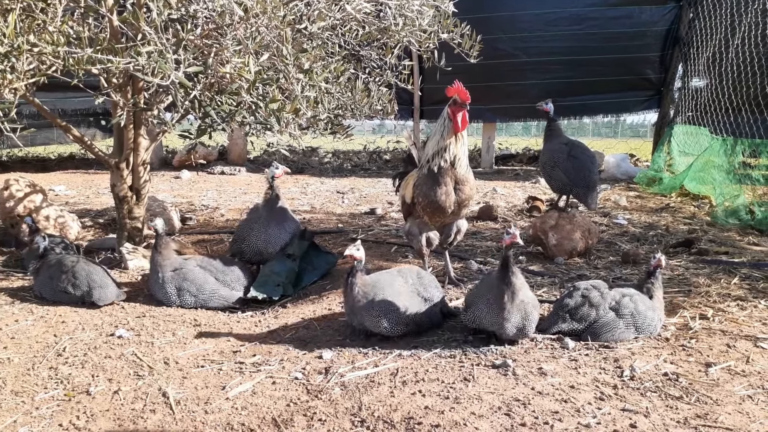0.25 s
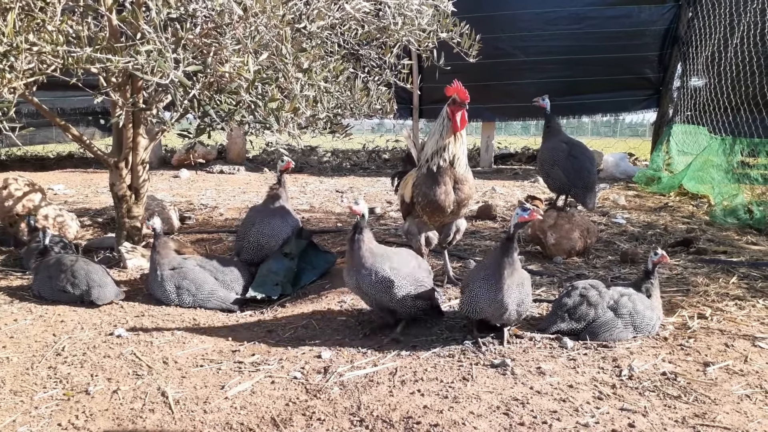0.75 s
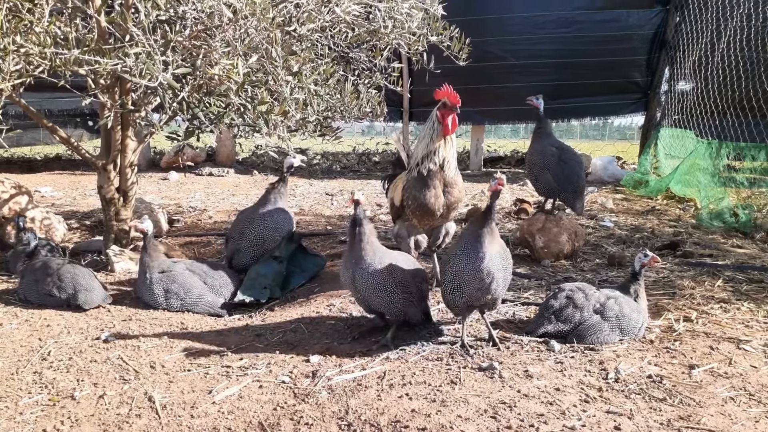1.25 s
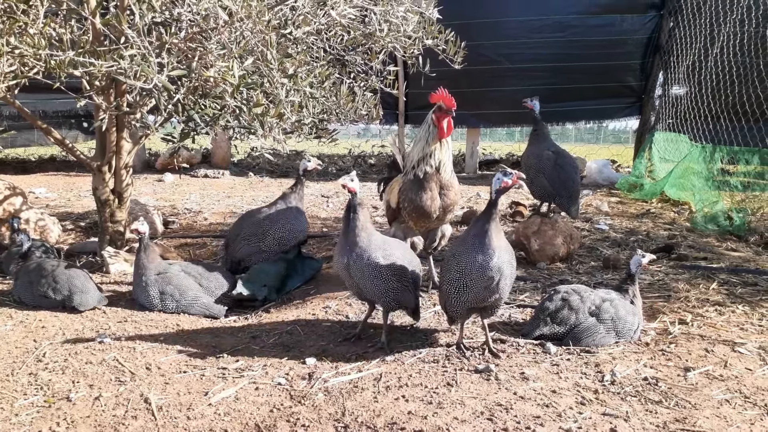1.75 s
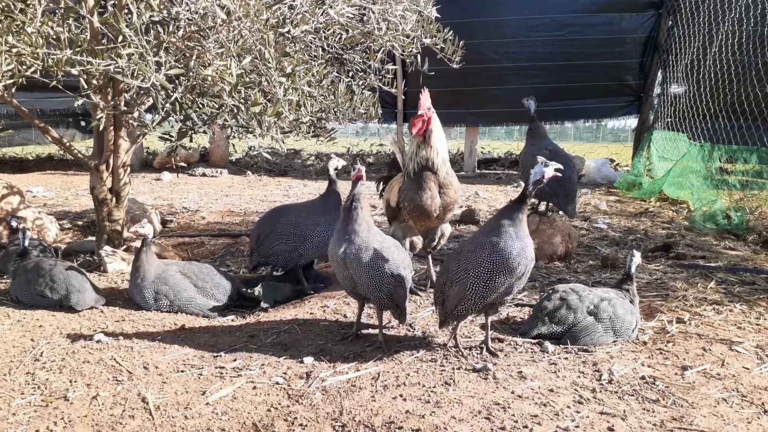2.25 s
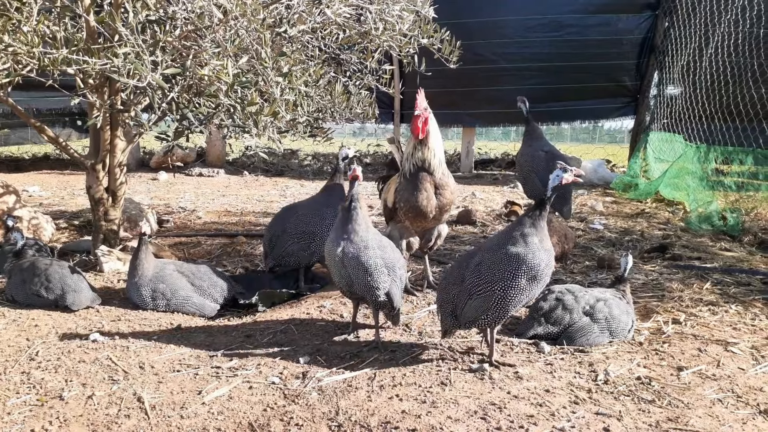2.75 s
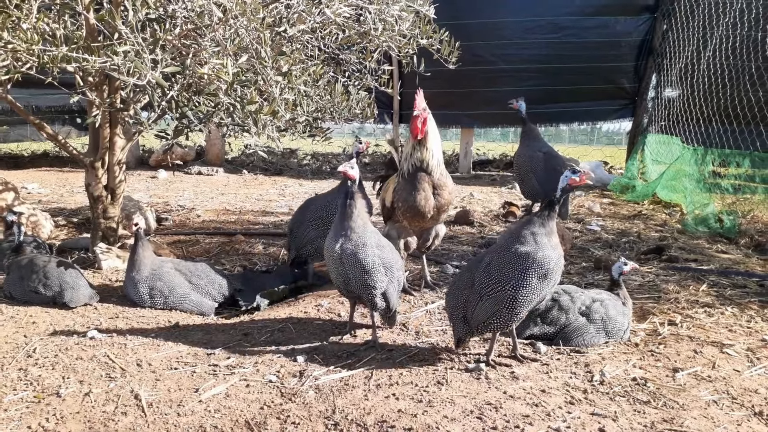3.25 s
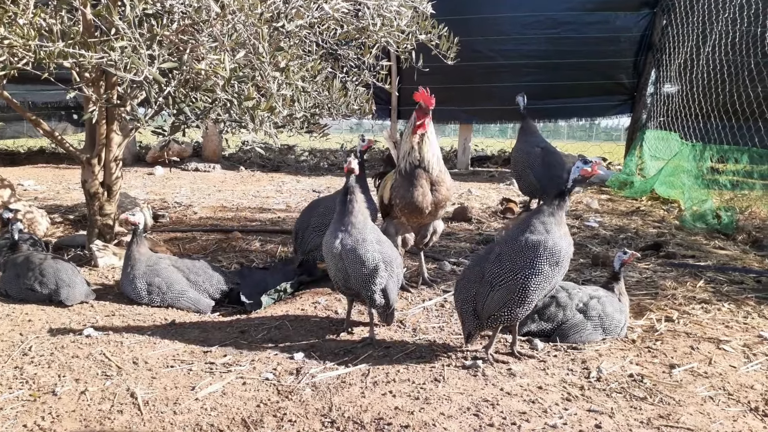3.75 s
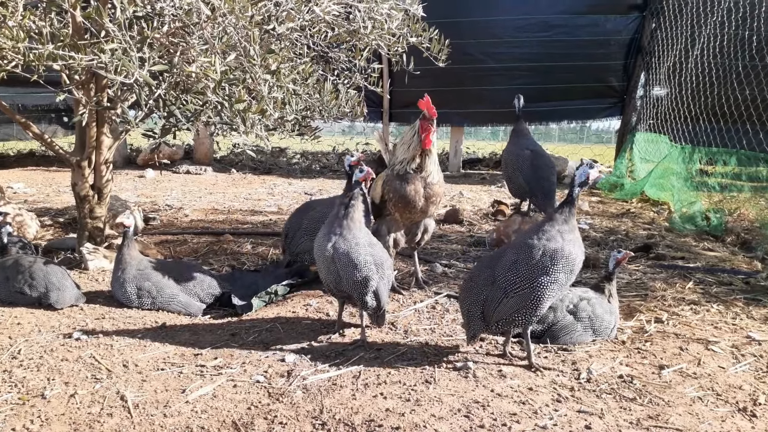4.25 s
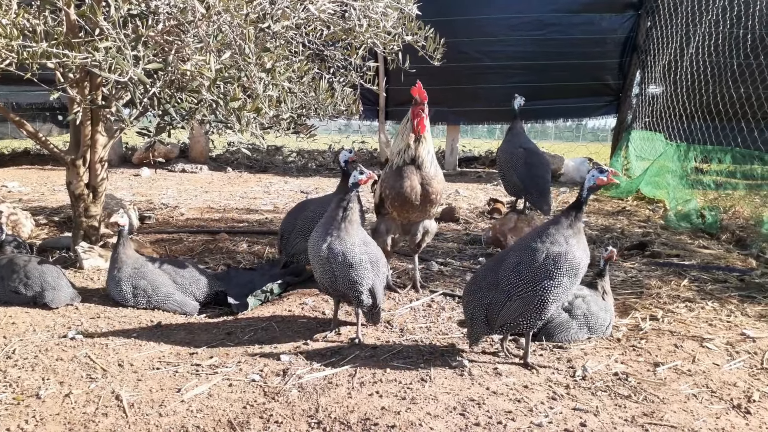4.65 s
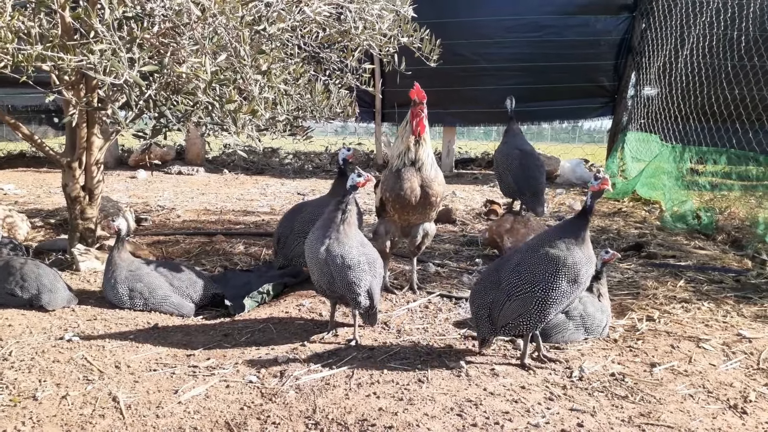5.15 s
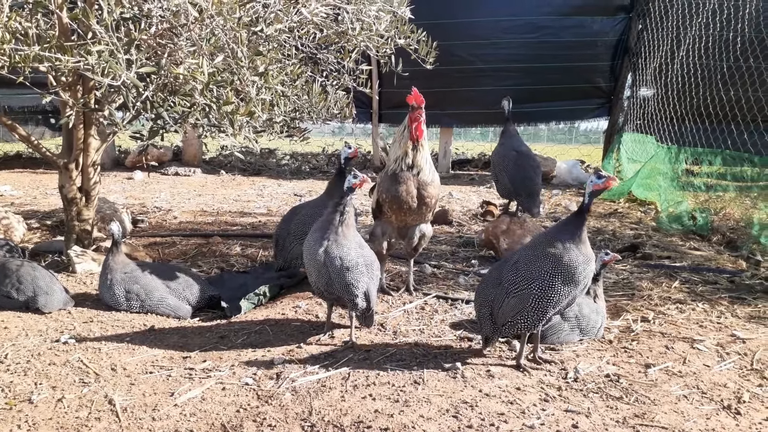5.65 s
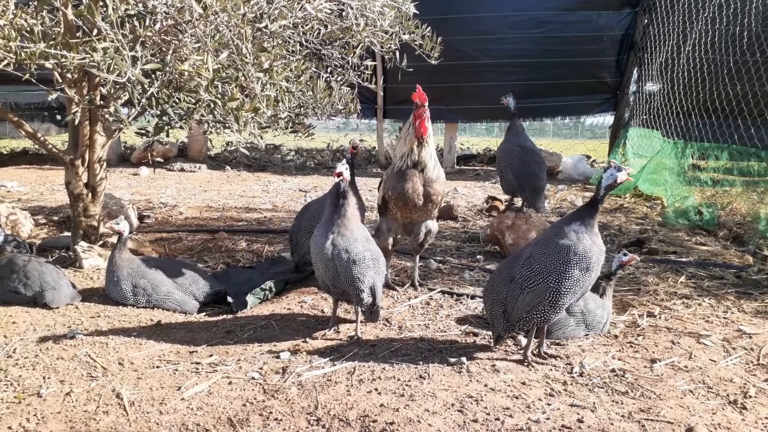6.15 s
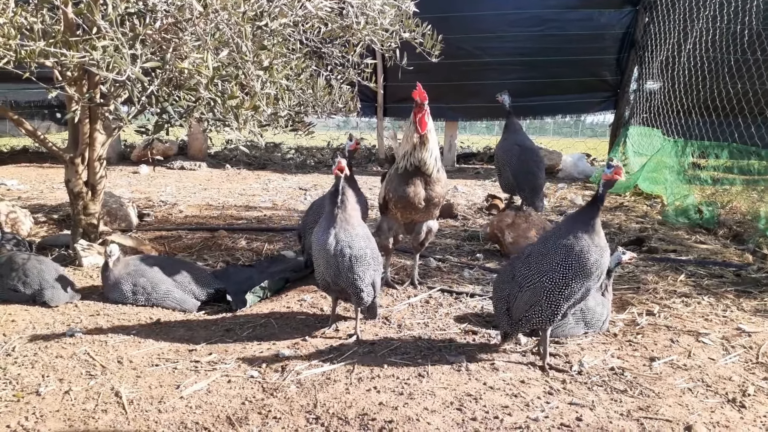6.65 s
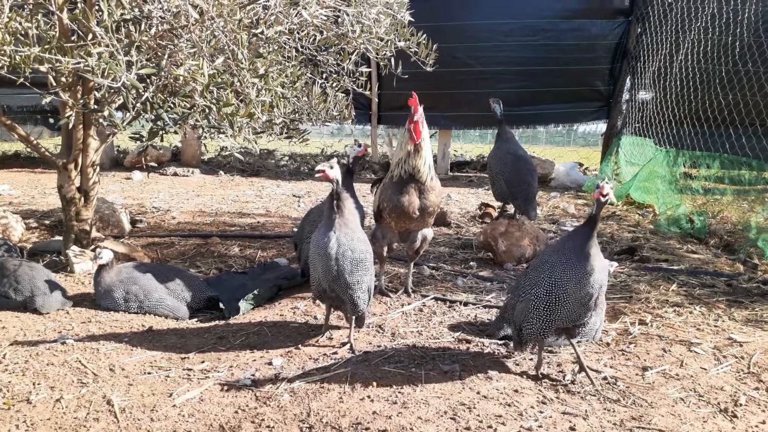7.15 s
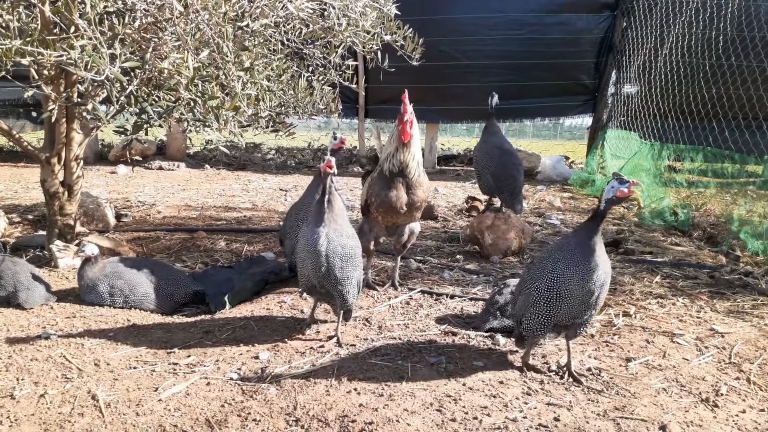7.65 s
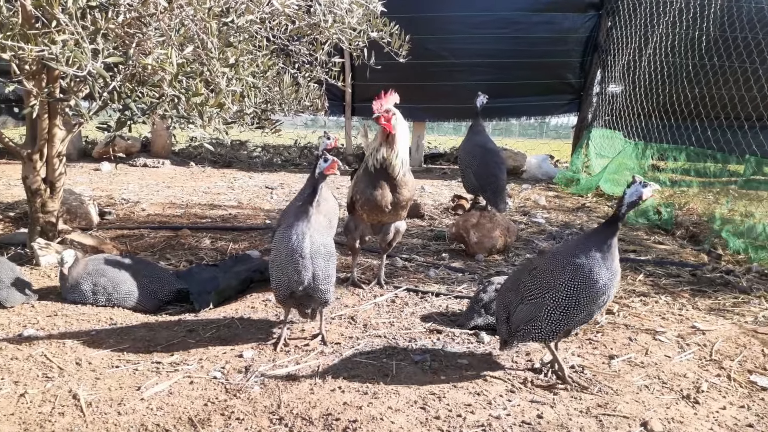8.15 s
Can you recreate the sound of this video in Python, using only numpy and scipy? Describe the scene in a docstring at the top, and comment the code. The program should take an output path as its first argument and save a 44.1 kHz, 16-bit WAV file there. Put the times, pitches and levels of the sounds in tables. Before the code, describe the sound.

Two guinea fowl a few metres away give short raspy cackles in an outdoor farm run, many opened by a quick high whistle or thin squeak. Sparse at first, the calls become steady, then a rooster crows once in the middle, its last syllable long and rough. A rattling chatter follows and the cackling thickens to the end. Phone stereo sound, dry and close, faint yard rumble.

```python
"""Guinea fowl cackle a few metres from a phone in an open farm run: a raspy syrinx buzz through throat and beak,
often opened by a short whistle or thin squeak; one bird rattles the same buzz in bursts.
A rooster crows once among them, a stack of partials between clear and hoarse that doubles its period
in the long last syllable. Ticks and scratching feet are scraps of noise; behind lie a short echo
off ground, fence and shed and a faint rumble of the yard."""
import sys
import numpy as np
from scipy import signal
from scipy.fft import rfft, irfft, next_fast_len
from scipy.io import wavfile
from scipy.ndimage import uniform_filter1d

SR = 44100
rng = np.random.default_rng(int(sys.argv[2]) if len(sys.argv) > 2 else 0)


def dump_mix(stems):
    """Bounce the given channels to the path in sys.argv[1] as a 16-bit WAV at rate SR."""
    frames = np.atleast_2d(stems).T  # one column per channel
    limited = np.clip(frames, -1, 1)  # hard clip at full scale
    pcm = np.round(limited * 32767).astype(np.int16)
    wavfile.write(sys.argv[1], SR, pcm)


N = 369999

LEFT, RIGHT = 0, 1  # the two calling birds, as rows of FOWL
# The two birds. Each row: pitch every note sags toward in Hz, swell over a note in dB, lag at the left port
# in samples, throat resonance in Hz before the beak moves it, its gain in dB, beak resonances as a ratio.
FOWL = [(331.6, -0.5, 0.8, 1985, 16.4, 1.0206), (318, -3.5, 6, 1886, 15, 1.025)]
# Notes shorter than FULL_S (seconds) sag further.
CLIPPED_HZ_PER_S, FULL_S = 453, 0.08
# Cackles. Each row: start in seconds, length in seconds, opening pitch in Hz, relative level in dB,
# beak opening in dB, bird.
CACKLES = [(0, 0.045, 380, -26, -.5, RIGHT), (0.237, 0.058, 351, -34, 2, RIGHT),
           (0.446, 0.066, 344, -18.5, -0.5, RIGHT), (0.511, 0.038, 386, -28, -8.5, LEFT),
           (0.727, 0.043, 358, -19, -10, RIGHT), (1.029, 0.052, 370, -18, -4, RIGHT),
           (1.212, 0.1, 376, -21.5, -0.5, LEFT), (1.289, .12, 356, -23, -3.5, RIGHT),
           (1.463, 0.089, 359, -20.5, -2, LEFT), (1.589, 0.04, 397, -18, -6, RIGHT),
           (1.722, 0.11, 339, -19.5, -2, LEFT), (1.82, 0.081, 391, -15.5, -5, RIGHT),
           (2.065, 0.069, 403, -18, -4.5, RIGHT), (2.313, 0.043, 397, -18.5, -6.5, RIGHT),
           (2.465, .09, 341, -25.5, -3.5, RIGHT), (2.565, 0.087, 395, -17, -5, RIGHT),
           (2.779, 0.089, 348, -32, 3, RIGHT), (2.836, 0.07, 383, -19, -4, RIGHT),
           (2.966, 0.035, 411, -30, 1, LEFT), (3.043, .092, 404, -17, -3, RIGHT),
           (3.185, 0.097, 365, -22.5, -1, LEFT), (3.288, 0.015, 348, -20.5, 5, LEFT),
           (3.336, 0.059, 394, -18, -2.5, RIGHT), (3.466, 0.082, 353, -21, 0.5, LEFT),
           (3.55, 0.08, 409, -17, -2, RIGHT), (3.775, 0.088, 402, -16.5, -1, RIGHT),
           (4.036, 0.059, 397, -19.5, -5, RIGHT), (4.114, 0.18, 353, -25, -3, RIGHT),
           (4.261, 0.077, 411, -19, -2.5, RIGHT), (4.535, 0.097, 368, -21, -7.5, RIGHT),
           (4.757, .075, 392, -15.5, -4, RIGHT), (4.874, 0.15, 353, -23.5, -10, LEFT),
           (5.015, 0.09, 383, -17.5, -5.5, RIGHT), (5.173, 0.13, 361, -23.5, -9.5, LEFT),
           (5.465, 0.07, 362, -21, -6.5, RIGHT), (5.823, 0.12, 359, -24.5, -7, LEFT),
           (6.086, 0.1, 382, -21, -2.5, RIGHT), (6.178, .092, 374, -20.5, 4.5, LEFT),
           (6.378, 0.088, 388, -18, -2.5, LEFT), (6.447, .17, 366, -20, .5, LEFT),
           (6.582, 0.055, 333, -31, 14.5, LEFT), (6.638, 0.076, 390, -21.5, -5, RIGHT),
           (6.717, 0.067, 378, -22.5, 7.5, LEFT), (6.795, .11, 353, -22, 5, LEFT),
           (6.897, 0.066, 398, -19.5, -.5, RIGHT), (6.939, 0.056, 383, -20, 4, LEFT),
           (7.07, 0.12, 374, -23, 5.5, LEFT), (7.155, 0.069, 399, -19.5, -7.5, LEFT),
           (7.219, .075, 357, -29, -6.5, RIGHT), (7.295, .11, 376, -22, 5, LEFT),
           (7.399, .069, 386, -18, -1.5, RIGHT), (7.524, 0.071, 398, -21, 5, LEFT),
           (7.619, 0.079, 364, -22, 3, LEFT), (7.697, 0.067, 385, -21.5, -2.5, RIGHT),
           (7.744, 0.066, 400, -20.5, 4.5, LEFT), (7.901, 0.074, 358, -23, 3.5, RIGHT),
           (7.948, 0.083, 389, -17.5, -1, LEFT), (8.157, 0.095, 377, -19, 1, LEFT),
           (8.24, 0.069, 367, -24.5, -7.5, LEFT), (8.371, 0.053, 353, -22, 6, LEFT)]
# Windpipe colour of the buzz. Each row: frequency in Hz, gain in dB.
WINDPIPE = [(120, -81), (300, -39.5), (780, -14.5), (1050, 0.5), (1400, -4.5), (2300, -2), (2700, -45),
            (4000, -24.5)]
# Beak resonances before a bird's size and beak movement scale them.
# Each row: frequency in Hz, width in Hz, gain in dB.
BEAK = [(2690, 1300, -11.5), (3043, 630, -16.5), (3986, 460, -2), (4657, 346, 1), (6260, 1000, -14.5)]
# Colour of the breath hiss. Each row: frequency in Hz, gain in dB.
HISS = [(5000, -41), (7500, -6.5), (11800, -5), (15500, -8)]
CHEST_DB = -19.5  # chest note, the buzz's first partial
# While the birds still rise from the ground (seconds), chest note and opening squeak are stronger, by up to CROUCH_DB.
RISEN_S, CROUCH_DB = 1.5, 12.5
# Rattling calls. Each row: start in seconds, number of bursts, first gap in seconds, last gap in seconds,
# pitch in Hz, relative level in dB, beak opening in dB.
RATTLES = [(5.593, 23, .0215, .0248, 342.3, -17.5, -2), (6.2, 12, 0.02023, 0.0251, 353.8, -17, 0)]
# Whistles, mostly opening a cackle of the bird on the right.
# Each row: start in seconds, length in seconds, pitch in Hz, relative level in dB.
WHISTLES = [(0, 0.015, 1617, -17.5), (0.702, 0.0416, 1666, -15.5), (0.909, 0.026, 1710, -42),
            (0.936, 0.019, 1615, -29.5), (0.963, 0.019, 1830, -35), (.996, 0.044, 1695, -17),
            (1.198, 0.024, 1720, -38), (1.258, 0.05, 1676, -18.5), (1.55, 0.046, 1700, -15.5),
            (2.034, 0.053, 1610, -22.5), (2.283, 0.04, 1760, -18), (2.447, .026, 1540, -31),
            (2.803, 0.039, 1710, -16), (3.174, 0.046, 1595, -24.5), (3.31, 0.03, 1760, -14.5),
            (3.536, 0.021, 1700, -16), (4.009, 0.03, 1766, -13), (4.507, 0.034, 1727, -17),
            (5.008, 0.014, 1714, -16), (5.44, 0.035, 1744, -17), (5.781, 0.063, 1753, -18),
            (6.061, 0.027, 1780, -18.5), (6.345, 0.033, 1790, -16), (6.609, 0.032, 1746, -18),
            (6.883, 0.029, 1732, -16), (7.136, 0.018, 1755, -15), (7.377, 0.026, 1762, -16),
            (7.499, 0.043, 1630, -27), (7.663, 0.046, 1744, -18.5), (7.853, 0.048, 1647, -27),
            (7.927, 0.024, 1804, -18.5), (8.368, 0.02, 1705, -25)]
# Louder whistles are purer, and the overtones dim as the bird turns away:
# relative overtones in dB at the start for a -19 dB whistle, dB per dB of level, dB per second.
OVERTONES_DB, PURITY_DB_PER_DB, TURN_DB_PER_S = -10, -0.75, -0.53
# Thin squeaks ahead of a cackle. Each row: start in seconds, length in seconds, first pitch in Hz,
# last pitch in Hz, peak level in dB.
SQUEAKS = [(0.414, 0.044, 2860, 4240, -29), (0.683, 0.026, 3030, 2640, -20.5),
           (2.741, 0.042, 3760, 5400, -36.5), (2.958, 0.027, 5650, 3790, -19.5),
           (5.584, 0.03, 3450, 5240, -20.5)]
# The crow, one list a syllable. Each row: time in seconds, pitch in Hz, relative level in dB.
CROW = [
    [(4.372, 636, -19), (4.386, 664.6, -24.5), (4.426, 801, -23), (4.532, 786, -27), (4.58, 682, -45)],
    [(4.655, 586, -19), (4.672, 747, -25), (4.688, 822, -15), (4.717, 817, -18), (4.751, 637, -23),
     (4.765, 660, -31)],
    [(4.815, 735, -16.5), (4.839, 835, -18), (5.015, 809, -20), (5.045, 728, -28), (5.105, 704, -25.5)],
    [(5.11, 716, -30.5), (5.18, 731, -38.5), (5.205, 616, -29), (5.233, 752.6, -21.5), (5.38, 730, -25),
     (5.65, 777, -24), (5.9, 771.5, -27), (6.113, 755, -26), (6.181, 703, -25.5), (6.2, 598, -19),
     (6.23, 540, -57)],
]
# The crow's voice. Each row: time in seconds, half-pitch lines in dB, hoarseness in dB.
CROW_VOICE = [(4.37, -1, -9), (4.6, -1, 0), (4.68, -9, -27), (4.74, -44, -12), (4.77, -30, -4),
              (4.83, -50, -54), (4.875, -46, -7.5), (4.89, -12.5, -10), (5.1, -6, -10), (5.15, 5.5, -3.5),
              (5.22, -20, -4.5), (5.245, 0.5, -19), (6.16, 1.5, -29.5), (6.22, -30, -2)]
# The rooster's throat. Each row: frequency in Hz, gain in dB.
CROW_THROAT = [(120, -57), (380, -39), (700, -3.5), (1900, -5.5), (2250, -43), (2600, -15), (3200, -30.5),
               (4100, -18), (4900, -20), (5700, -41), (6600, -18.5), (7400, -41.5), (10000, -31.5),
               (15000, -33)]
EFFORT_DB_PER_DB = -0.08  # the crow's upper partials fall slightly less than its level
# Small ticks before a call and scratching feet. Each row: start in seconds, peak level in dB.
TICKS = [(1.957, -50), (1.972, -35), (2.001, -34.5), (2.019, -25), (2.26, -36), (3.026, -30.5),
         (3.756, -36), (3.988, -36), (7.06, -32.5), (8.138, -37), (8.346, -46)]
# Colour of the yard's rumble. Each row: frequency in Hz, gain in dB.
YARD = [(20, -17.5), (150, -14.5), (600, -20.5), (1300, -36.5), (4400, -34.5), (20000, -69.5)]
YARD_DB = -62.5
TOP_HZ = 15800  # top of the phone's range


def cackles():
    """Each note sags from its opening pitch toward the bird's resting pitch, fastest at the end."""
    out = np.zeros((2, N))
    for s, length, first_hz, db, beak_db, bird in CACKLES:
        rest_hz, swell_db, *build = FOWL[bird]
        last_hz = rest_hz - CLIPPED_HZ_PER_S * max(FULL_S - length, 0)
        n = next_fast_len(int((length + 0.047) * SR))
        u = np.arange(n) / SR / length
        hz = first_hz + (last_hz - first_hz) * (0.15 + u ** 2)
        breath = swell(n, length, rise=0.0081, fall=0.041)
        breath = breath * undb(swell_db * (np.minimum(u, 1) - 0.5))
        crouch_db = CROUCH_DB * max(1 - s / RISEN_S, 0)
        add(out, undb(db) * buzz(hz, breath, beak_db, *build, crouch_db), s)
    return out


def buzz(hz, breath, beak_db, lag, throat_hz, throat_db, size, crouch_db=0):
    """Uneven syrinx pulses, each with a puff of air; a wider beak raises the throat resonance."""
    n = len(hz)
    t = np.arange(n) / SR
    turns = np.cumsum(hz * (1 + 0.021 * wander(n, hz=300))) / SR
    # sixteen equal harmonics make one sharp pulse a turn
    half = np.pi * (turns - np.round(turns)) + 1e-9
    pulses = np.sin(33 * half) / np.sin(half) - 1
    pulses = level(pulses * undb(2.5 * wander(n, hz=120)), 0)
    # air is strongest as each pulse opens
    puffs = level(rng.standard_normal(n) * (1.3 + np.exp(-(turns % 1) / 1.1)), 0)
    voiced = pulses + undb(-6) * puffs

    source = colour(voiced * breath, WINDPIPE)
    throat_modes = [(throat_hz + 20 * beak_db, 380, throat_db)]
    throat = closing(source, throat_modes, 0.99, 0.897, order=2)
    low = level(throat - np.roll(source, 40), 0)
    # the phone's body shades the left port in the throat band
    low = np.array([undb(-2.0) * np.roll(low, 2), undb(2.0) * low])

    scale = np.sqrt(np.mean(breath ** 2))
    chest = undb(CHEST_DB + crouch_db) * np.sin(2 * np.pi * turns)
    chest = chest * uniform_filter1d(breath, size=800) / scale
    chest = chest * undb(2 * wander(n, hz=45)) * np.clip(t / 0.021, 0, 1)

    # the rasp needs more pressure than the buzz, so it dies first and comes in patches
    rasp = (undb(-7.5) * pulses + puffs) * breath ** 1.86
    rasp = rasp * undb(1.05 * wander(n, hz=70))

    # the syrinx squeaks for a moment before the buzz settles
    opening = puffs * breath * np.exp(-t / 0.018)
    squeak = ring(opening, [(2700, 350, beak_db + 15 + crouch_db)], order=2) / scale
    squeak = squeak * undb([[2], [-2.5]])
    return scale * (low + chest + breathy(rasp, beak_db, lag, size) + squeak)


def breathy(puffs, beak_db, lag, size=1):
    """Turbulent air through beak resonances that reach the left port late, plus a hiss unlike at each port."""
    size = size + 0.022 * rng.standard_normal()
    port_lag = np.array([[lag], [0]])
    beak = closing(puffs, BEAK, 1.0244 * size, 0.83 * size, order=2, lag=port_lag)
    other = np.abs(puffs) * np.sign(rng.standard_normal(len(puffs)))
    hiss = colour(puffs + 0.11 * other * np.array([[1], [-1]]), HISS)
    # every call finds its own bright spots in the hiss
    spots = [(hz, 500, 7) for hz in rng.uniform(7100, 14780, size=4)]
    hiss = (hiss + ring(hiss, spots)) * undb(1.8 * wander(len(puffs), hz=60))
    return level(beak, beak_db) + level(hiss, beak_db - 13.0)


def closing(x, modes, start, end, **more):
    """Resonances that slide from start to end times their frequency as the beak closes."""
    u = np.linspace(0, 1, len(x))
    # crossfade two fixed sets of resonances
    opened = ring(x * (1 - u), [(hz * start, width, db) for hz, width, db in modes], **more)
    closed = ring(x * u, [(hz * end, width, db) for hz, width, db in modes], **more)
    return opened + closed


def rattles():
    """The same buzz chopped into bursts that slow down, stronger at the left port."""
    out = np.zeros((2, N))
    for s, count, first_gap, last_gap, hz, db, beak_db in RATTLES:
        edges = np.cumsum(np.r_[0, np.linspace(first_gap, last_gap, int(count))])
        n = next_fast_len(int((edges[-1] + 0.029) * SR))
        beat = np.interp(np.arange(n) / SR, edges, np.arange(len(edges))) % 1
        bursts = 0.05 + np.sin(np.pi * beat ** 0.75) ** 2
        breath = bursts * swell(n, edges[-1], rise=0.15, fall=0.1)
        sound = buzz(np.full(n, 1.0 * hz), breath, beak_db, *FOWL[LEFT][2:])
        add(out, undb(db + np.array([[2.5], [-2.5]])) * sound, s)
    return out


def whistles():
    """A near-pure tone with two overtones that grows until it breaks off."""
    out = np.zeros((2, N))
    for s, length, hz, db in WHISTLES:
        over_db = OVERTONES_DB + PURITY_DB_PER_DB * (db + 19) + TURN_DB_PER_S * s
        n = next_fast_len(int((length + 0.053) * SR))
        t = np.arange(n) / SR
        glide = 0.043 * (t / length - 0.5)
        turns = np.cumsum(hz * (1 + glide + 0.016 * wander(n, hz=250))) / SR
        gate = swell(n, length, rise=0.0039, fall=0.0078) ** 2
        # escaping air roughens the tone
        air = rng.standard_normal(n) * gate
        beak_air = breathy(air, db - 5.5 + 0.14 * over_db, 4.92)
        add(out, beak_air + level(colour(air, WINDPIPE), db - 18.0), s)
        # left then right port: fundamental's shading in dB, lag in samples
        for port, (shade_db, lag) in enumerate([(-10.0, 6.3), (-0.5, 4.3)]):
            late = 2 * np.pi * (turns - hz * lag / SR)
            overtones = np.sin(2 * late) + 0.5 * np.sin(3 * late)
            tone = undb(shade_db) * np.sin(late) + undb(over_db - 5.0) * overtones
            grow = undb(db + 4.5 + 2.4 * (t / length + 1.5) + 2.16 * wander(n, hz=200))
            add(out[port:port + 1], tone * grow * gate, s)
    return out


def squeaks():
    """A thin tone of unsteady pitch that sweeps up or down, fading in and out."""
    out = np.zeros((2, N))
    for s, length, first_hz, last_hz, db in SQUEAKS:
        n = int(length * SR)
        hz = np.linspace(first_hz, last_hz, n) * (1 + 0.094 * wander(n, hz=910))
        add(out, undb(db) * np.sin(2 * np.pi * np.cumsum(hz) / SR) * np.hanning(n), s)
    return out


def crow():
    """Partials of half the pitch: odd ones sound when the period doubles; hoarseness adds throat noise."""
    out = np.zeros((2, N))
    k = np.arange(1, 40)[:, None]
    voice_s, half_points, hoarse_points = np.transpose(CROW_VOICE)
    for syllable in CROW:
        s, hz, db = np.transpose(syllable)
        t = np.arange(s[0], s[-1], 1 / SR)
        n = len(t)
        level_db = np.interp(t, s, db)
        half_gain = undb(np.interp(t, voice_s, half_points))
        hoarse = undb(np.interp(t, voice_s, hoarse_points))
        half_hz = uniform_filter1d(np.interp(t, s, hz), size=600) / 2
        half_hz = half_hz * (1 + 0.022 * hoarse * wander(n, hz=169))

        # gains are held for 64 samples at a time
        gains = curve(k * half_hz[::64], CROW_THROAT).repeat(64, axis=1)[:, :n]
        gains = gains * np.where(k % 2, half_gain, 1)
        # upper partials come and go, and thin out with the doubled period, the even ones most
        drift = np.array([wander(n // 64 + 1, hz=3820) for _ in k])  # about 60 changes a second once held
        patchy = undb(4.7 * drift).repeat(64, axis=1)[:, :n]
        effort = undb(EFFORT_DB_PER_DB * (level_db - db.max()))
        thinning = undb(np.where(k % 2, -5.0, -18.0) * np.minimum(half_gain, 1))
        gains = gains * np.where(k > 5, patchy * effort * thinning, 1)

        turns = k * np.cumsum(half_hz) / SR + rng.random(k.shape)
        tone = (gains * np.sin(2 * np.pi * turns)).sum(axis=0)
        tone = tone * undb(5 * hoarse * wander(n, hz=120))
        rasp = level(colour(rng.standard_normal(n), CROW_THROAT), -1) * hoarse
        voice = (tone + rasp) * undb(level_db + 8)
        voice = voice * swell(n, t[-1] - t[0], rise=0.0081, fall=0.0067)
        add(out, voice * undb([[-1.6], [1.4]]), s[0])
    return out


def ticks():
    """Brief scrapes of noise in one broad resonance."""
    out = np.zeros((2, N))
    t = np.arange(1024) / SR
    for s, db in TICKS:
        scrape = rng.standard_normal(len(t)) * np.exp(-t / 0.014)
        tick = ring(scrape, [(2560, 2900, 0)])
        add(out, undb(db) * tick / np.abs(tick).max(), s)
    return out


def echo(birds):
    """Ground, fence and shed return a short scatter and a fainter long one, as decaying noise."""
    t = np.arange(SR // 3) / SR
    # each falls 60 dB in the time given, in seconds
    tail = undb(-29) * undb(-60 * t / 0.085) + undb(-71) * undb(-60 * t / 0.8)
    tint = [(150, -10.5), (600, -5), (5000, 2.0), (16000, 3.0)]  # Hz, dB
    scatter = tail * colour(rng.standard_normal((2, len(t))), tint)
    return signal.fftconvolve(birds, scatter, axes=1)[:, :N]


def yard():
    """Faint outdoor rumble: coloured noise partly shared by both ports."""
    mid, side = rng.standard_normal((2, N))
    return level(colour(mid + 0.33 * side * np.array([[1], [-1]]), YARD), YARD_DB)


def undb(db):
    """Amplitude ratio of a level in dB."""
    return 10 ** (np.asarray(db) / 20)


def level(x, db):
    """Scale a sound to an RMS level in dB."""
    return x * undb(db) / np.sqrt(np.mean(x ** 2) + 1e-18)


def curve(hz, points):
    """Gain of (Hz, dB) points joined on a log-frequency axis."""
    f, db = np.transpose(points)
    return undb(np.interp(np.log(hz + 1), np.log(f), db))


def colour(x, points):
    """Filter a sound by a gain curve of (Hz, dB) points."""
    n = x.shape[-1]
    return irfft(rfft(x) * curve(np.fft.rfftfreq(n, 1 / SR), points), n)


def ring(x, modes, order=1, lag=0):
    """Resonances (Hz, width in Hz, dB) side by side, then a delay of lag samples."""
    f = np.fft.rfftfreq(x.shape[-1], 1 / SR) + 1
    gain = sum(undb(db) / (1 + 1j * (f - hz * hz / f) / width) ** order for hz, width, db in modes)
    delay = np.exp(-2j * np.pi * f * lag / SR)
    return irfft(rfft(x) * gain * delay, x.shape[-1])


def wander(n, hz):
    """Smooth chance of RMS 1 that changes about hz times a second."""
    k = max(int(SR / hz), 2)
    smooth = uniform_filter1d(uniform_filter1d(rng.standard_normal(n), k), k)
    return level(smooth, 0)


def swell(n, length, rise, fall):
    """Straight opening over rise, then a rounded close over fall, centred on length (all in seconds)."""
    t = np.arange(n) / SR
    close = np.sin(np.pi / 2 * np.clip((length + fall / 2 - t) / fall, 0, 1)) ** 2
    return np.clip(t / rise, 0, 1) * close


def add(out, x, s):
    """Mix a sound in at s seconds, cut at the end of the scene."""
    i = int(s * SR)
    out[:, i:i + x.shape[-1]] += x[..., :N - i]


def scene():
    """The birds and their feet, the echo around them, and the yard behind."""
    birds = cackles() + rattles() + whistles() + squeaks() + crow() + ticks()
    return birds + echo(birds) + yard()


def record(dry):
    """The phone rounds the loudest peaks, thins the deep bass and cuts the top."""
    rounded = np.tanh(0.77 * dry) / 0.87
    bass_cut = signal.butter(2, 70, "high", fs=SR, output="sos")
    top_cut = signal.ellip(10, 0.2, 80, TOP_HZ, fs=SR, output="sos")
    return signal.sosfilt(top_cut, signal.sosfilt(bass_cut, rounded))


dry = scene()
out = record(dry)
dump_mix(out)
```